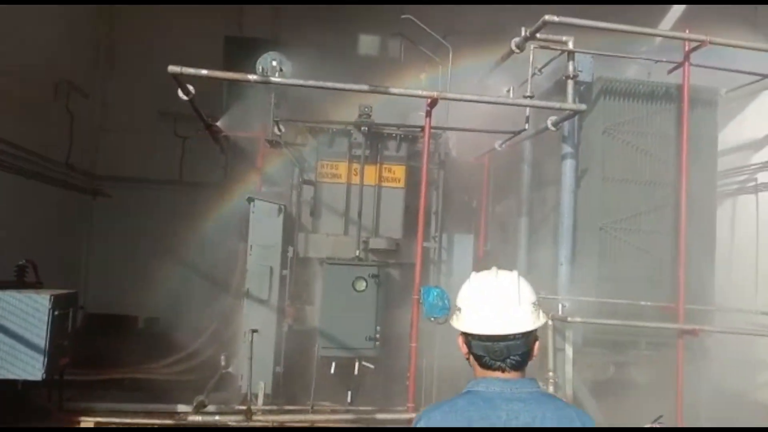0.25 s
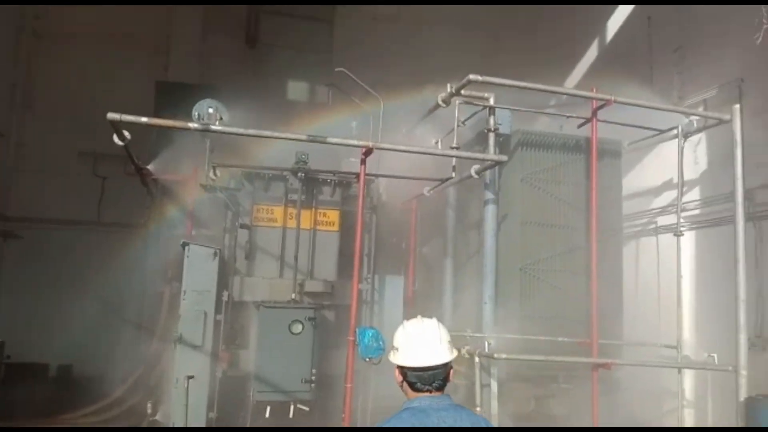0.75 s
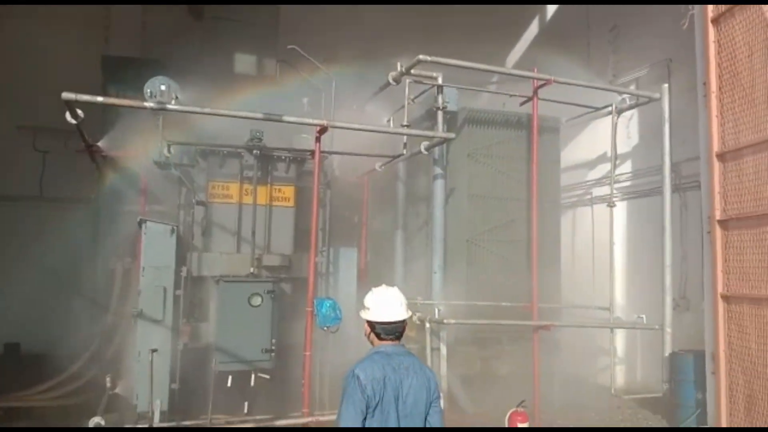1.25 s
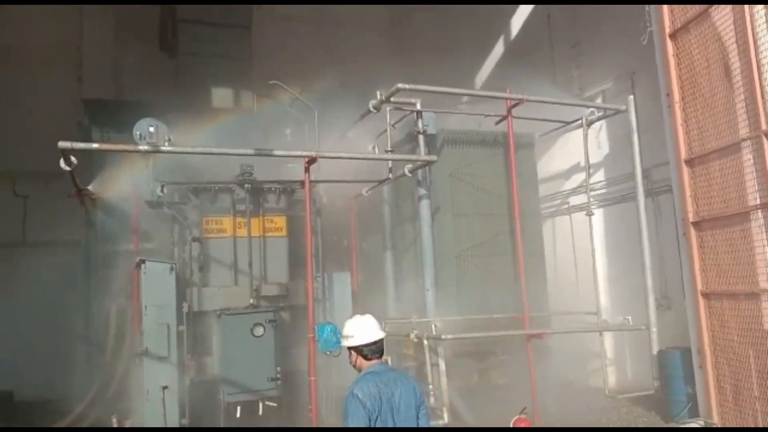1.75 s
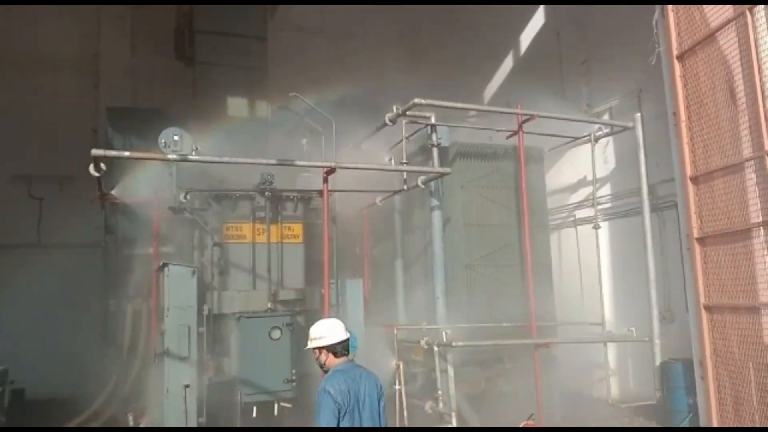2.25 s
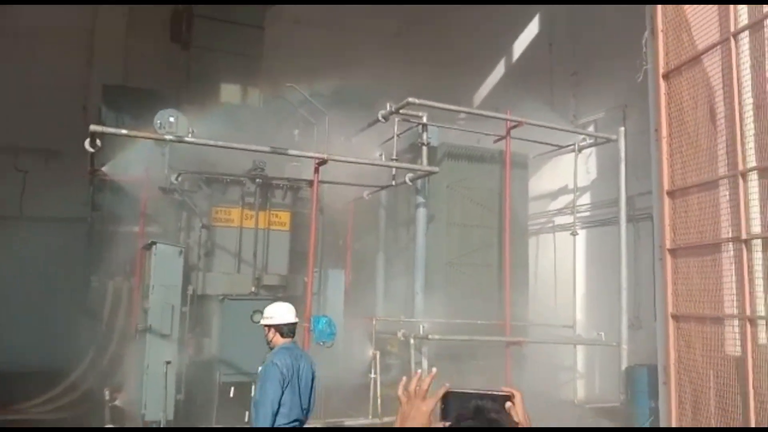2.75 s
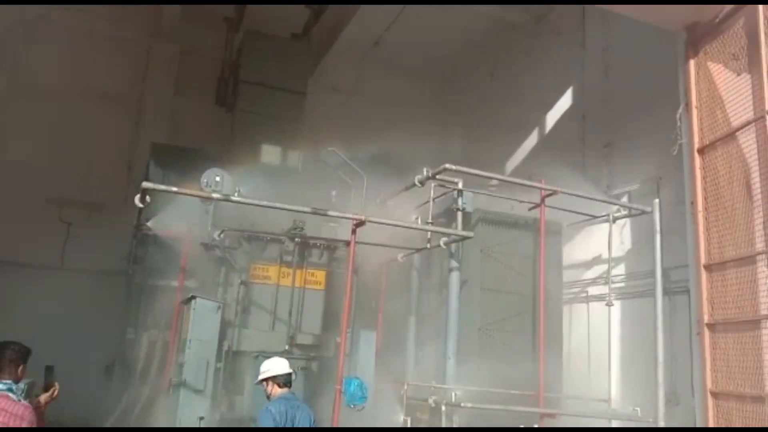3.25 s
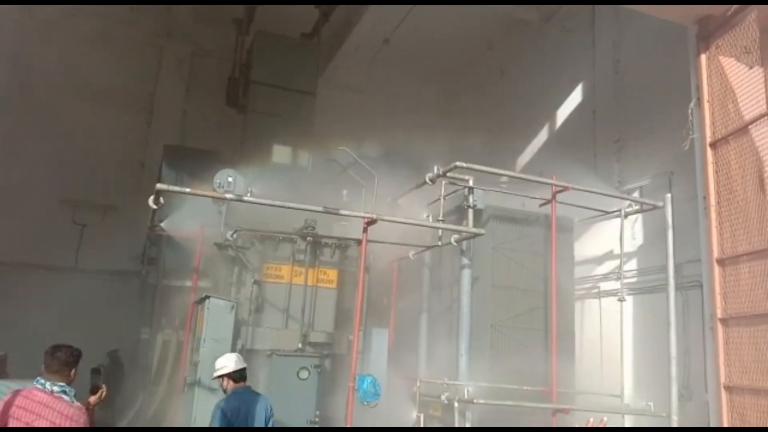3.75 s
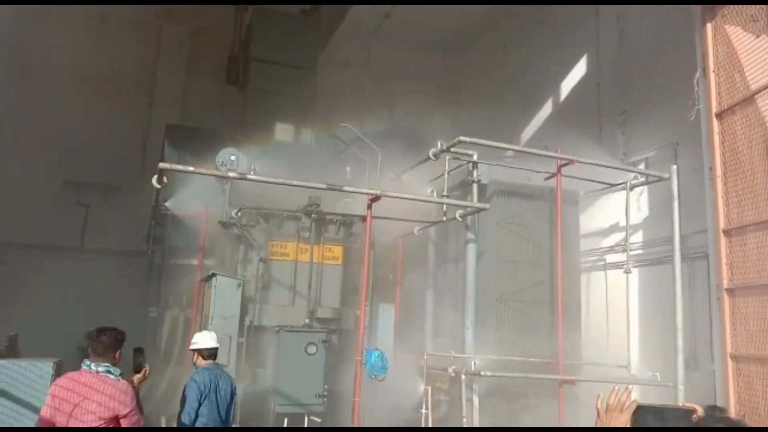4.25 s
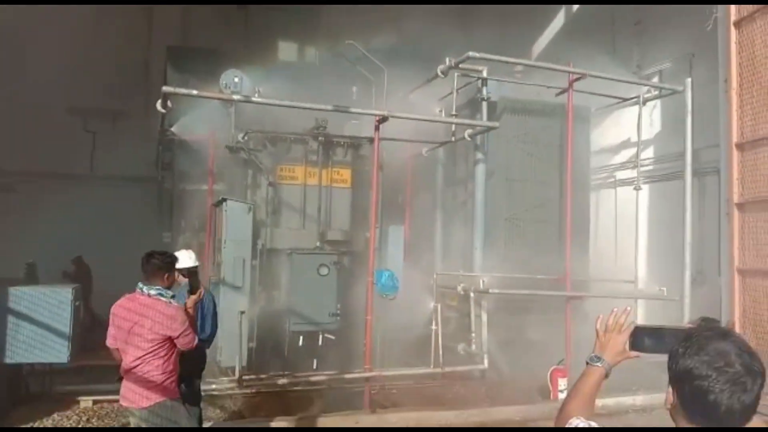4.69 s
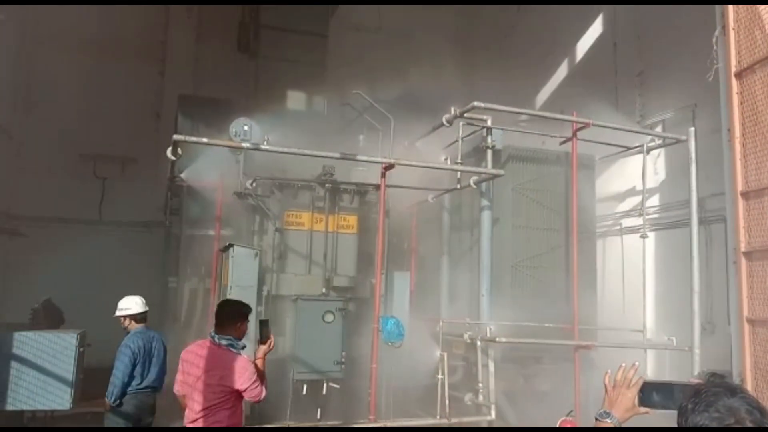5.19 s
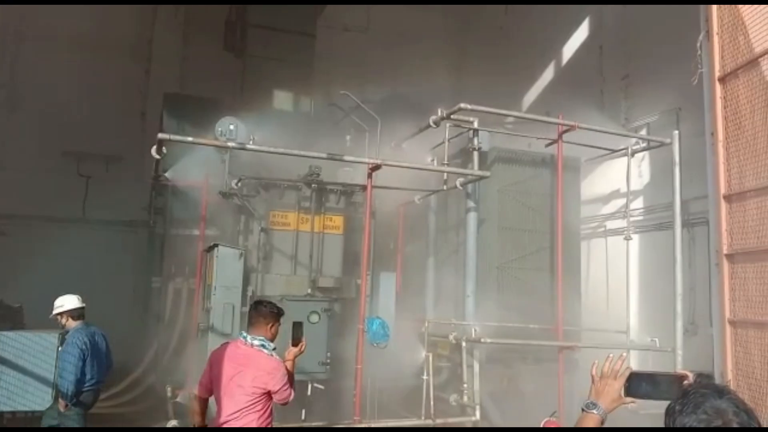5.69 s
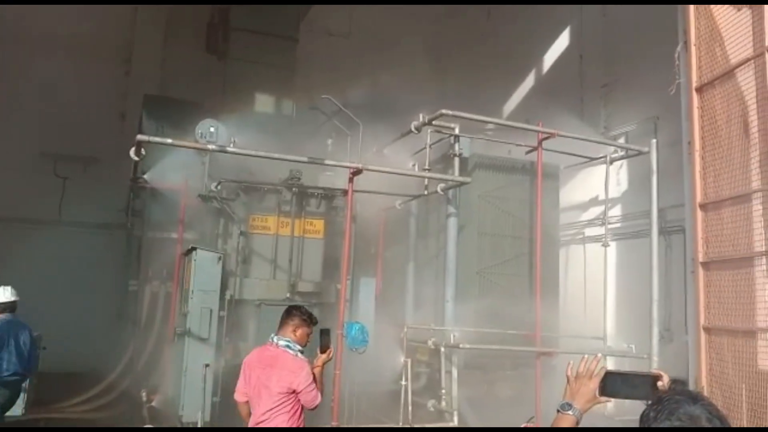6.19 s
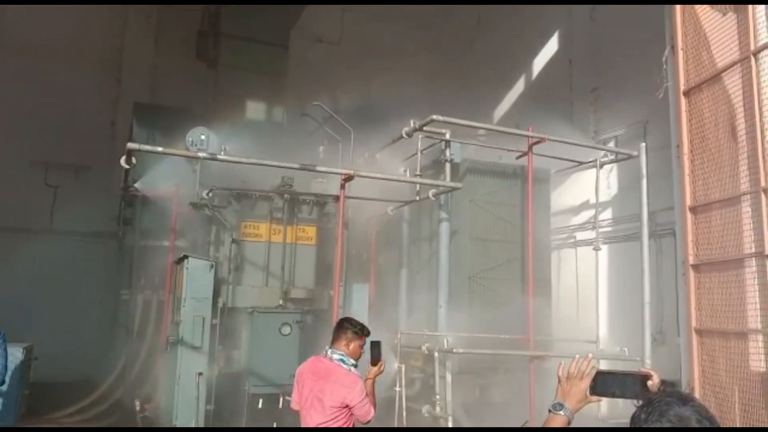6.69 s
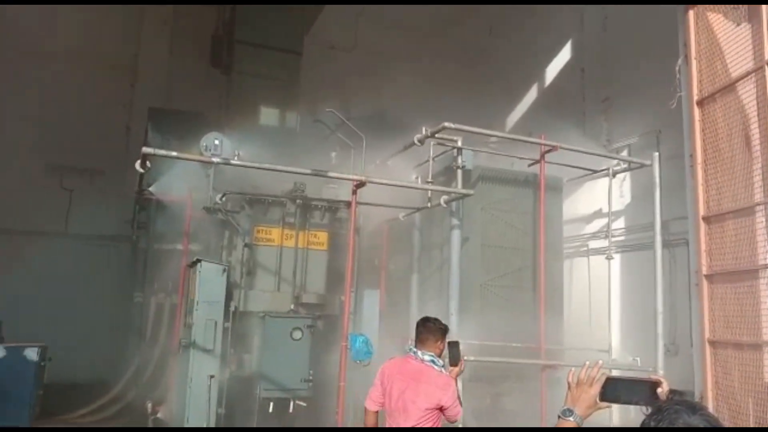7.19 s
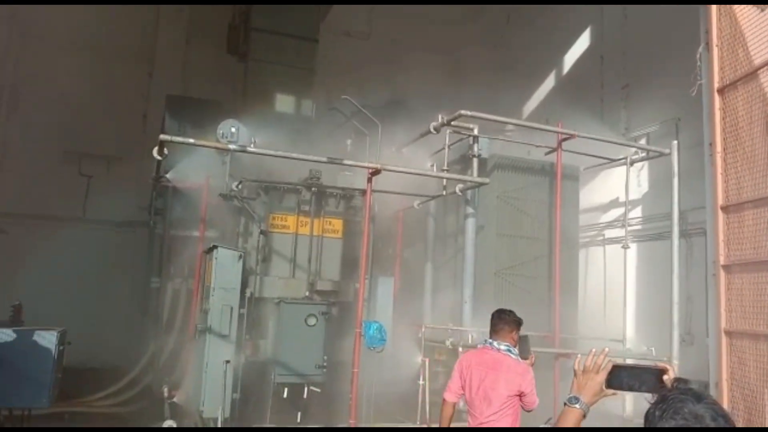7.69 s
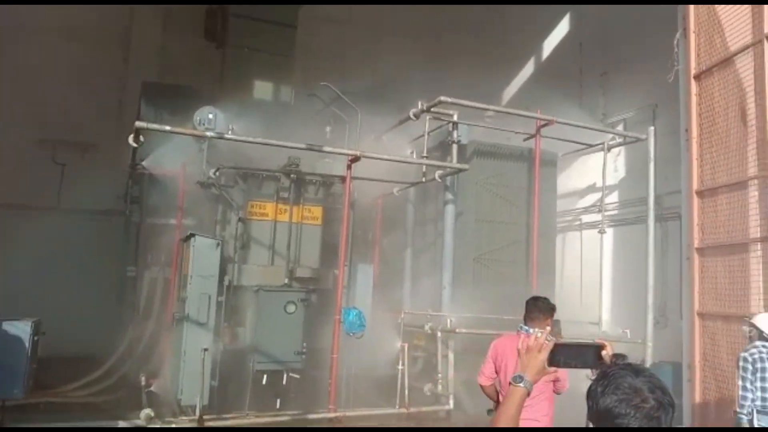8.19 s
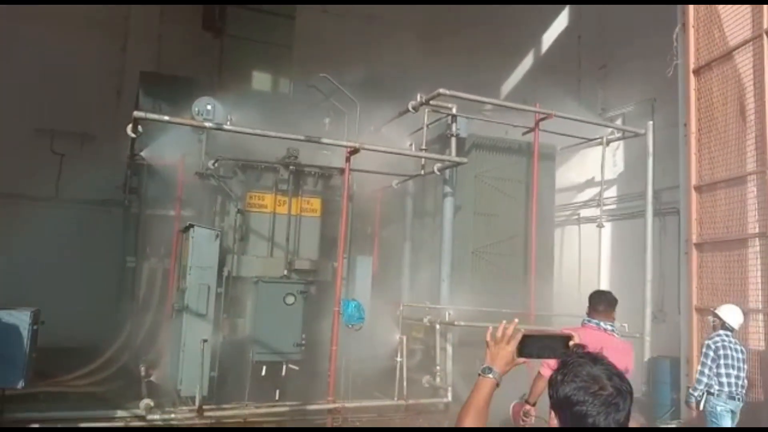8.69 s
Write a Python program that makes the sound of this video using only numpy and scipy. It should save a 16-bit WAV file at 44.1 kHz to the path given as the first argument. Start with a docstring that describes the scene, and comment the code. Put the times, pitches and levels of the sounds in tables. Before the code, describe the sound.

A loud, even rush of water jets fills an industrial bay, heard in mono. A high fizz of fine droplets on metal tops the hiss, with quieter splashing on the ground, drumming on a steel tank and gurgling runoff below. A faint mains hum and four soft, dull knocks are almost buried in the spray. The hiss turns a little brighter just before it cuts off abruptly, at almost nine seconds.

```python
"""A loud, steady hiss of water jets: deluge nozzles spray mist over a transformer in a concrete bay.
Turbulence makes the hiss and excites one narrow resonance of the pipework. Fine drops fizz on the steel;
heavier ones splash, drum on the tank and gurgle away. Beneath lie a faint mains hum, four dull knocks
and one swell of a low drone. Near the end the mist brightens, then all stops at once. Heard in mono."""
import sys
import numpy as np
from scipy import signal
from scipy.fft import rfft, irfft, next_fast_len
from scipy.io import wavfile
from scipy.ndimage import uniform_filter1d, map_coordinates

SR = 44100
rng = np.random.default_rng(int(sys.argv[2]) if len(sys.argv) > 2 else 0)


def materialize(psi):
    """Save the field psi as 16-bit PCM at rate SR to the path in sys.argv[1].

    A 1-D psi becomes a single channel; in a 2-D psi each row is a channel.
    """
    bounded = np.clip(np.atleast_2d(psi).T, -1, 1)
    quanta = np.round(bounded * 32767).astype(np.int16)
    wavfile.write(sys.argv[1], SR, quanta)


N = 394254

# Harmonics of the transformer core: (frequency [Hz], rms level [dB])
HUM_PARTIALS = [(100, -67.5), (200, -71.5), (300, -58.5), (600, -64), (700, -51)]
# Dull knocks: (time [s], peak level [dB], pitch [Hz], Gaussian standard deviation [s])
KNOCK_EVENTS = [(3.327, -38, 248, 0.018), (3.47, -40, 295, 0.035), (6.81, -36.5, 270, 0.019),
                (8.545, -39, 240, 0.033)]

# Level curves: (time [s], level [dB])
RUNOFF_LEVEL = [(0, -42), (2.3, -43.5), (3.3, -43), (4, -44), (5.4, -45.5), (5.6, -40.5), (6.2, -44.5),
                (8.72, -42)]  # water coming down on the tank
SPRAY_LEVEL = [(0.06, -19.5), (1.38, -20.5), (1.6, -20.5), (1.79, -21.5), (3.31, -21.5), (3.55, -21.5),
               (3.6, -21), (4.61, -21.5), (7.98, -21), (8.29, -22), (8.7, -21)]  # the spray; jets, mist and splashes follow it
HISS_OVER_ROAR = [(0, -6), (3, -6.5), (6.7, -6.5), (7, -6), (8.3, -5), (8.72, -7)]  # the jets' upper hiss relative to their roar

# Noise spectra: (frequency [Hz], relative spectral density [dB])
DRUM_SPECTRUM = [(20, -29), (40, -35.5), (65, -14), (100, -6.5), (150, -10.5), (280, 0), (400, 1),
                 (600, -1.5), (1500, -38.5), (4000, -80)]  # heavy drops on the tank
SPLASH_SPECTRUM = [(200, -44.5), (450, -11.5), (560, -3.5), (700, -0.5), (900, 0), (1100, 2.5),
                   (1500, -8.5), (2400, -11.5), (5000, -50.5)]  # heavy drops on the ground
FIZZ_SPECTRUM = [(6500, -25), (8000, -5.5), (8600, -3), (9100, -.3), (9500, 0), (10300, -4.2), (11200, -7),
                 (12000, -8), (13000, -10.5), (13950, -12.3), (14300, -6), (14650, -.7), (15400, -3)]  # fine drops on the steel
SHEEN_SPECTRUM = [(8800, -24), (9900, 2.5), (10600, 0), (11400, -1), (12400, -20.5), (14000, -53.5)]  # bright band of the mist
HISS_SPECTRUM = [(3500, -45.5), (4500, -2.5), (5000, 1), (5650, 2), (6000, 0.5), (6300, -3), (6480, -0.5),
                 (6660, 1.4), (6830, 1), (7250, -0.1), (7620, -1.5), (8000, -12.5), (9000, -28)]  # upper band of the jets
ROAR_SPECTRUM = [(600, -61.5), (1100, -11.5), (1500, -6), (1950, -3.5), (2330, 0), (2750, -0.2), (3200, -2),
                 (3600, -2), (4000, -1.55), (4250, -5), (4550, -11.5), (5500, -38.5)]  # main band of the jets

DRONE_HZ, DRONE_DB = 62.2, -56
DRONE_START_S, DRONE_ATTACK_S, DRONE_HOLD_S, DRONE_RELEASE_S = 1.92, .25, .15, .45
PIPE_HZ, PIPE_WIDTH_HZ, PIPE_DB, PIPE_WAVER_DB = 1262, 115, -32, 2.1
FIZZ_DB, SPLASH_DB = -8.5, -10  # relative to the spray
JET_FLUTTER_DB, FIZZ_FLUTTER_DB = .02, -.1  # depth of the pressure flutter
SHEEN_DB, SHEEN_FOLLOWS = -48, 2.2  # base level; dB gained per dB of spray
BRIGHTEN_START_S, BRIGHTEN_RISE_S = 7.95, .56
SHEEN_LIFT_DB, PIPE_LIFT_DB, SPLASH_LIFT_DB = 12.5, 3, 1  # gains at full brightening
STOP_S, TOP_HZ = 8.757, 15500


def amp(db):
    """Decibels to amplitude ratio."""
    return 10 ** (np.asarray(db) / 20)


def unit(x):
    """Normalisation to rms 1."""
    return x / np.sqrt(np.mean(x ** 2) + 1e-20)


def clock():
    """Uniform sampling: the time of every sample in seconds."""
    return np.arange(N) / SR


def curve(rows):
    """Linear interpolation of (time, value) rows at every sample."""
    return np.interp(clock(), *np.transpose(rows))


def ramp(start_s, length_s):
    """A linear rise from 0 to 1."""
    return np.clip((clock() - start_s) / length_s, 0, 1)


def brightening():
    """The envelope of the late brightening, 0 to 1."""
    return ramp(BRIGHTEN_START_S, BRIGHTEN_RISE_S)


def wobble(rate):
    """Slow random modulation: a spline through rate Gaussian values a second."""
    return map_coordinates(rng.standard_normal(1024), [clock() * rate], mode="mirror")


def filtered(x, response):
    """Linear filtering: the spectrum of x times a frequency response."""
    padded = next_fast_len(N + SR // 2)
    return irfft(rfft(x, padded) * response(np.fft.rfftfreq(padded, 1 / SR)), padded)[..., :N]


def coloured(x, spectrum):
    """Spectral shaping by (Hz, dB) points joined over log frequency, at rms 1."""
    points_hz, db = np.transpose(spectrum)
    return unit(filtered(x, lambda hz: amp(np.interp(np.log(hz + 1), np.log(points_hz), db))))


def ringing(centre_hz, width_hz):
    """Forced resonance: noise through two like resonators in series, at rms 1."""
    mode = lambda hz: 1j * hz * width_hz / (centre_hz ** 2 - hz * hz + 1j * hz * width_hz)
    return unit(filtered(rng.standard_normal(N), lambda hz: mode(hz) ** 2))


def turbulence(patchy_db):
    """Intermittency: white noise with random gain patches in time and frequency, at rms 1."""
    spectra = signal.stft(rng.standard_normal(N), nperseg=512)[2]
    patches = uniform_filter1d(rng.standard_normal(spectra.shape), size=7, axis=0)
    patches = unit(uniform_filter1d(patches, size=10, axis=1))
    return unit(signal.istft(spectra * amp(patchy_db * patches), nperseg=512)[1][:N])


def impacts(rate, spread_db):
    """Shot noise: rate random drops a second, of log-normal size, at rms 1."""
    lands = rng.random(N) < rate / SR
    size = amp(spread_db * np.clip(rng.standard_normal(N), -2, 2))
    return unit(lands * size * rng.choice([-1, 1], N))


def far_drone():
    """Amplitude and phase modulation: a distant low tone swells once, wavering in pitch."""
    release_at_s = DRONE_START_S + DRONE_ATTACK_S + DRONE_HOLD_S
    swell = ramp(DRONE_START_S, DRONE_ATTACK_S) * (1 - ramp(release_at_s, DRONE_RELEASE_S))
    phase = 2 * np.pi * DRONE_HZ * clock() + .6 * wobble(9.4)
    return np.sqrt(2) * amp(DRONE_DB) * swell * np.sin(phase)


def transformer_hum():
    """Magnetostriction: the core flexes twice per mains cycle, so it hums on even harmonics."""
    hum = np.zeros(N)
    for hz, db in HUM_PARTIALS:
        peak = np.sqrt(2) * amp(db + .98 * wobble(1.6))
        hum += peak * np.sin(2 * np.pi * hz * clock() + .34 * wobble(2.03))
    return hum


def knocks():
    """Low resonances under Gaussian envelopes: with no sharp onset, each knock sounds dull."""
    thuds = np.zeros(N)
    for time_s, db, hz, sigma_s in KNOCK_EVENTS:
        swell = np.exp(-((clock() - time_s) / sigma_s) ** 2 / 2)
        thuds += amp(db) * swell * ringing(hz, width_hz=150)
    return thuds


def gurgle(rate, pitch_hz, decay_cycles, spread_db):
    """Bubble resonance: air pockets in the draining water ring briefly at scattered pitches, at rms 1."""
    when, tune, detune, size, phase = rng.random((int(rate * N / SR), 5)).T[:, :, None]
    t = np.arange(SR // 6) / SR
    hz = pitch_hz * 2 ** (tune - detune)
    age = t * hz / decay_cycles
    strength = amp(spread_db * size) * np.sqrt(hz)  # low pockets ring longer but more softly
    rings = strength * age * np.exp(-age) * np.sin(2 * np.pi * (hz * t + phase))
    at = (when * N).astype(int) + np.arange(len(t))
    return unit(np.bincount(at.ravel(), rings.ravel(), N)[:N])


def runoff(spray_db):
    """Impact noise: heavy drops splash on the ground and drum on the tank, and the water gurgles away."""
    splash = coloured(turbulence(patchy_db=1.4) + .25 * impacts(rate=700, spread_db=8), SPLASH_SPECTRUM)
    drum = coloured(turbulence(patchy_db=4.5) + .5 * impacts(rate=120, spread_db=3), DRUM_SPECTRUM)
    drain = gurgle(rate=70, pitch_hz=217.6, decay_cycles=2.03, spread_db=10)
    surge = wobble(14)  # the water comes down in uneven gushes
    rumble = amp(2 * surge) * drum + amp(-5.5) * drain
    splash_db = spray_db + SPLASH_DB + SPLASH_LIFT_DB * brightening() + .43 * surge
    return amp(splash_db) * splash + amp(curve(RUNOFF_LEVEL)) * rumble


def pipework():
    """Flow-excited resonance: one mode of the pipes sings, swelling unevenly."""
    song_db = PIPE_DB + PIPE_WAVER_DB * wobble(5) + PIPE_LIFT_DB * brightening()
    return amp(song_db) * ringing(PIPE_HZ, PIPE_WIDTH_HZ)


def mist(spray_db, flutter):
    """Superposition: tiny impacts on steel merge into a fizz; a bright sheen grows near the end."""
    drops = turbulence(patchy_db=1) + .5 * impacts(rate=5300, spread_db=2)
    fizz = amp(spray_db + FIZZ_DB + FIZZ_FLUTTER_DB * flutter) * coloured(drops, FIZZ_SPECTRUM)
    sheen = coloured(turbulence(patchy_db=1.3), SHEEN_SPECTRUM)
    sheen_db = SHEEN_DB + SHEEN_FOLLOWS * (spray_db - spray_db.mean())
    growth = 1 + (amp(SHEEN_LIFT_DB) - 1) * brightening()
    return fizz + amp(sheen_db) * growth * sheen


def nozzles(spray_db, flutter):
    """Turbulent atomisation: water sheets tear into mist with a broad roar and a thinner hiss above."""
    roar = coloured(turbulence(patchy_db=.12), ROAR_SPECTRUM)
    hiss = coloured(turbulence(patchy_db=.77) + .3 * impacts(rate=3000, spread_db=8), HISS_SPECTRUM)
    return amp(spray_db + JET_FLUTTER_DB * flutter) * (roar + amp(curve(HISS_OVER_ROAR)) * hiss)


def scene():
    """Linear superposition: the sources add and reach both channels alike."""
    spray_db = curve(SPRAY_LEVEL)
    flutter = wobble(25)  # water pressure, common to jets and fizz
    water = nozzles(spray_db, flutter) + pipework() + mist(spray_db, flutter) + runoff(spray_db)
    bay = water + knocks() + transformer_hum() + far_drone()
    return np.array([bay, bay])


def record(dry):
    """Gating and band limiting: the sound stops within 2 ms, and a steep low-pass cuts the top treble."""
    gate = np.clip((STOP_S - clock()) / .002 + .5, 0, 1)
    return filtered(dry * gate, lambda hz: (1 - np.tanh((hz - TOP_HZ) / 40)) / 2)


dry = scene()
out = record(dry)
materialize(out)
```